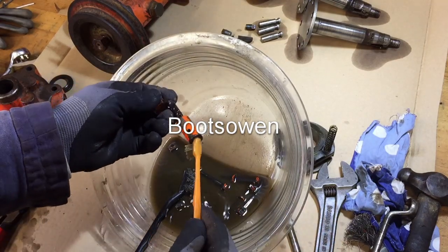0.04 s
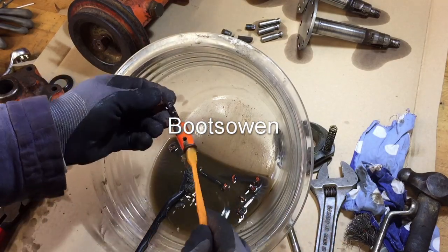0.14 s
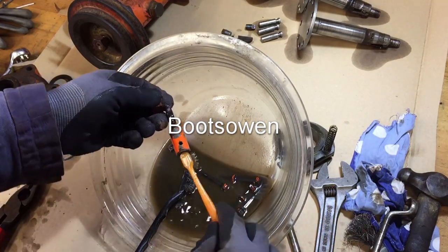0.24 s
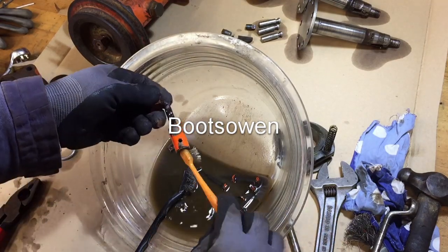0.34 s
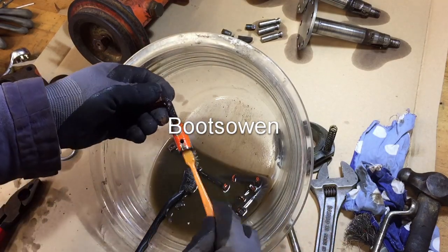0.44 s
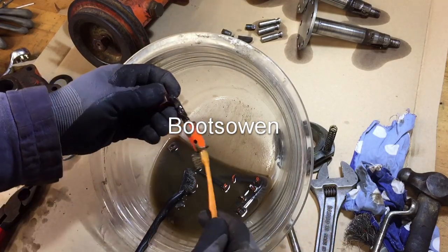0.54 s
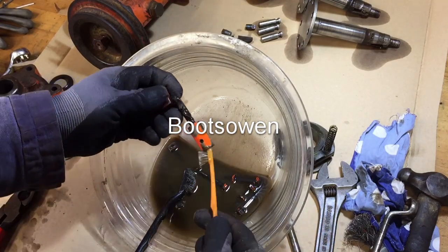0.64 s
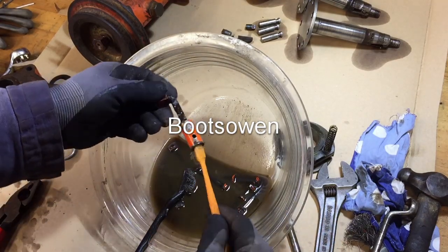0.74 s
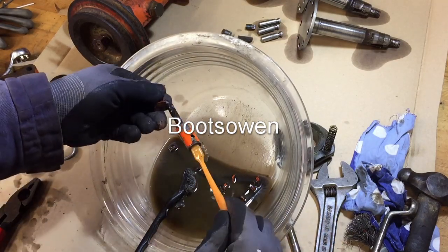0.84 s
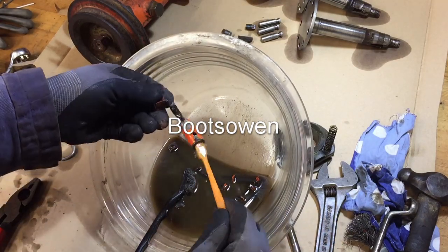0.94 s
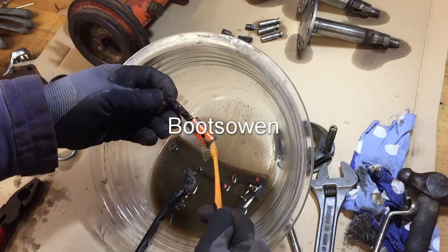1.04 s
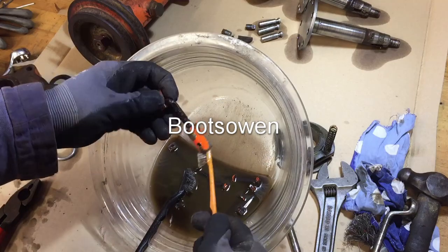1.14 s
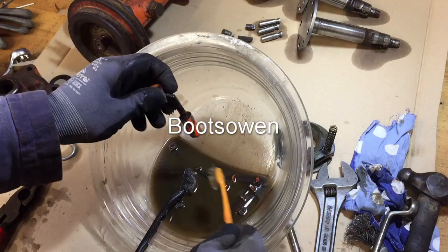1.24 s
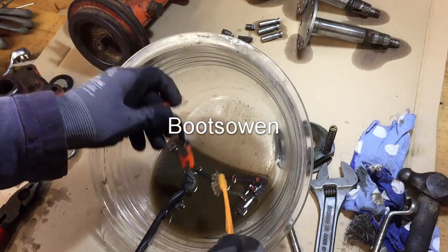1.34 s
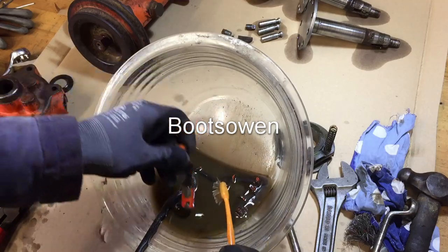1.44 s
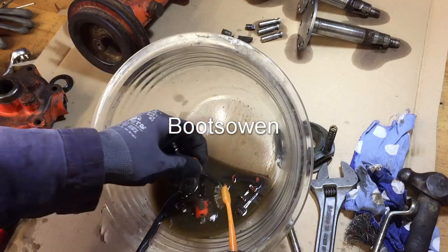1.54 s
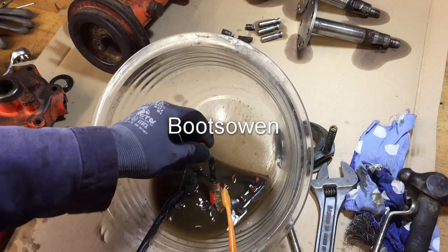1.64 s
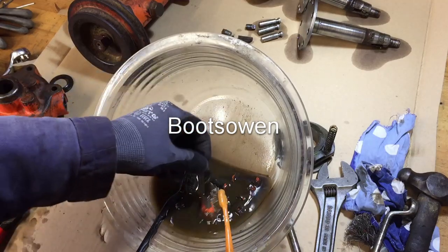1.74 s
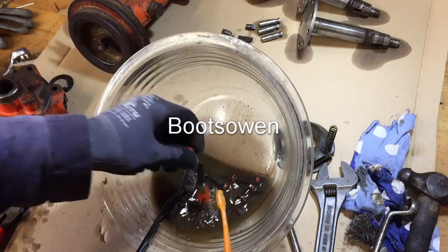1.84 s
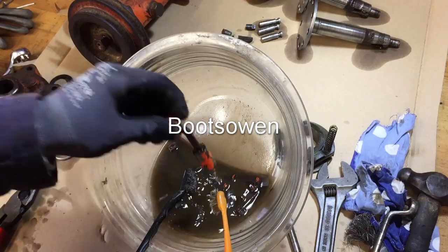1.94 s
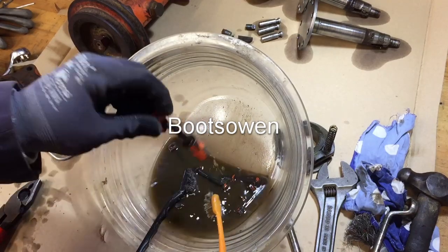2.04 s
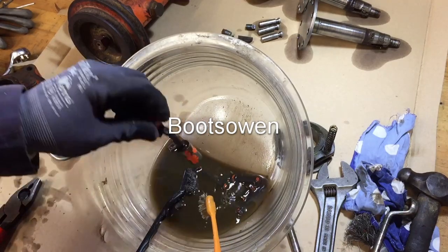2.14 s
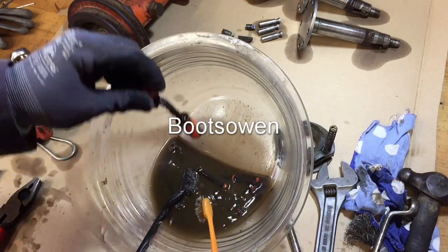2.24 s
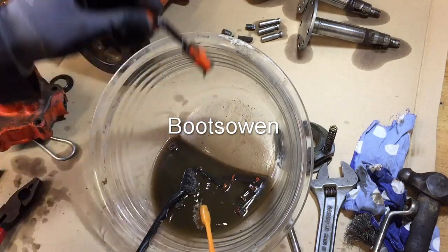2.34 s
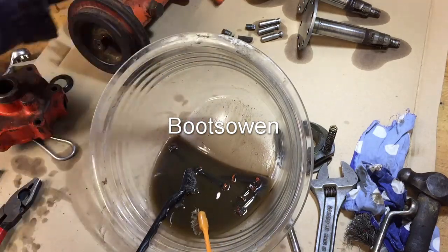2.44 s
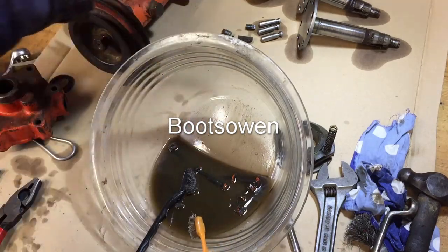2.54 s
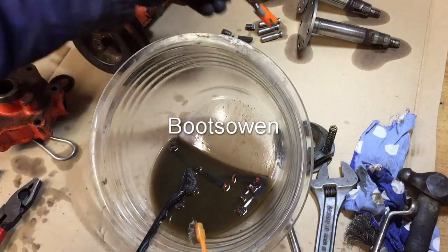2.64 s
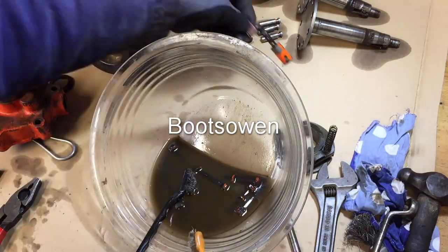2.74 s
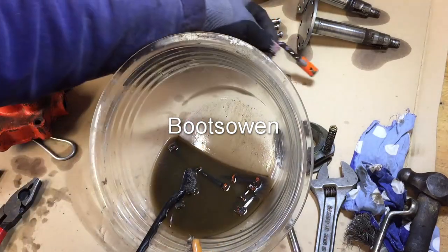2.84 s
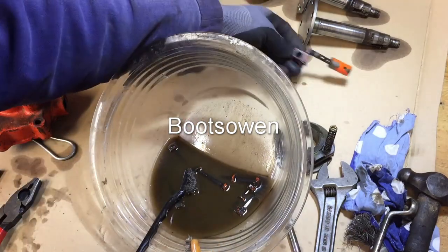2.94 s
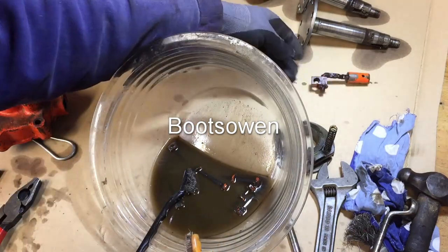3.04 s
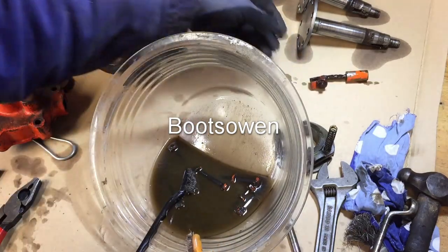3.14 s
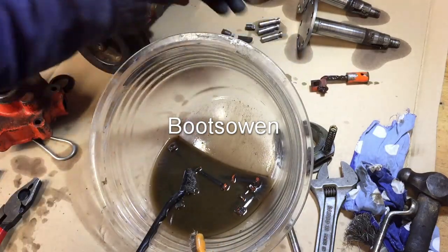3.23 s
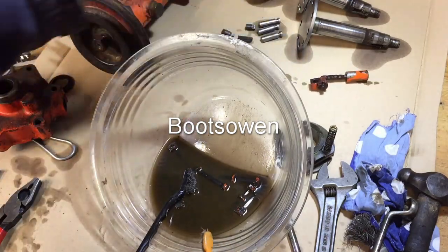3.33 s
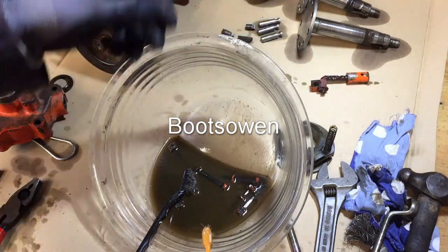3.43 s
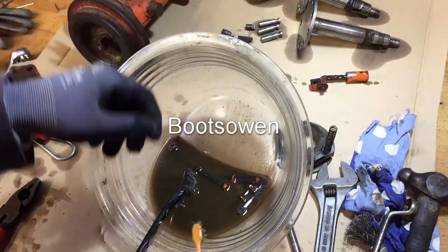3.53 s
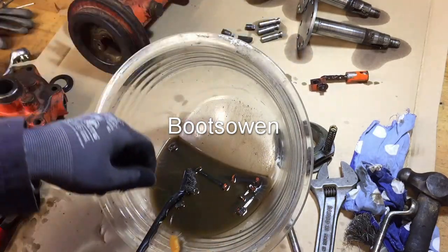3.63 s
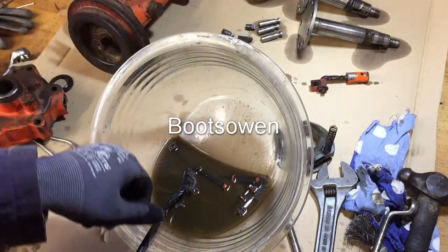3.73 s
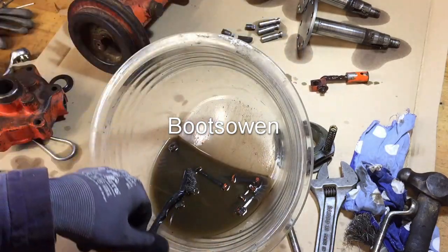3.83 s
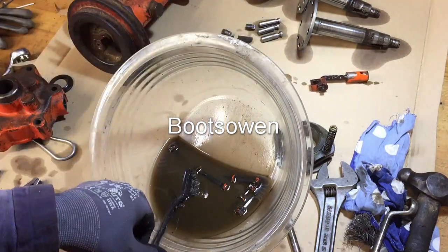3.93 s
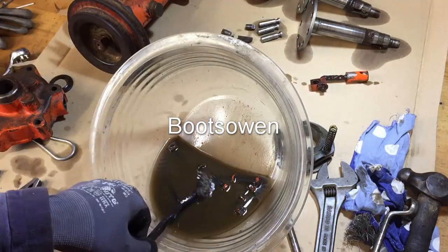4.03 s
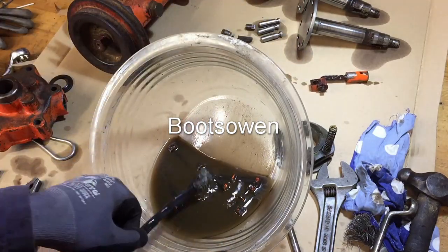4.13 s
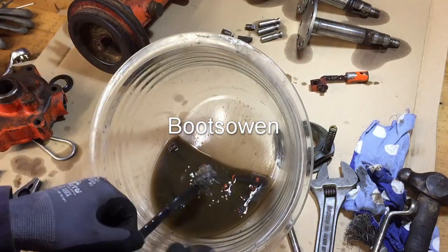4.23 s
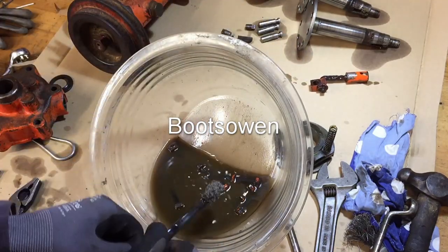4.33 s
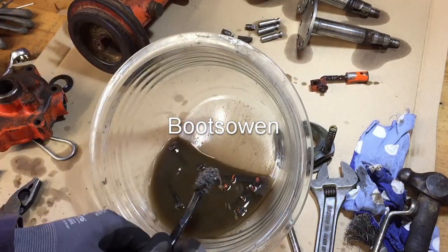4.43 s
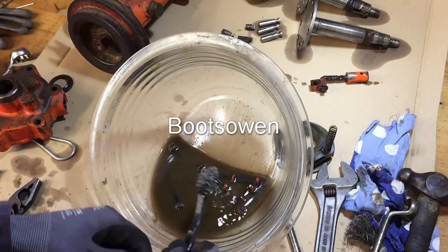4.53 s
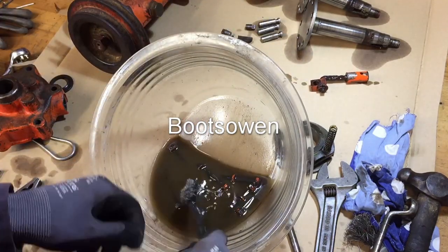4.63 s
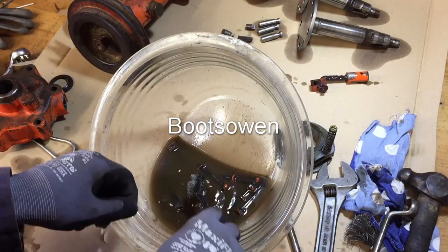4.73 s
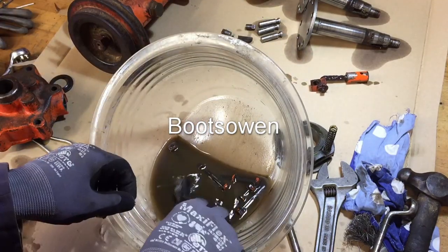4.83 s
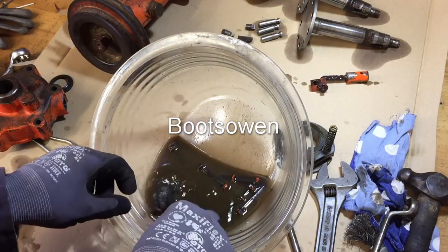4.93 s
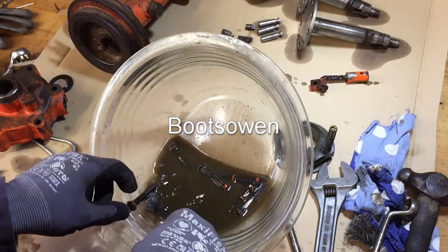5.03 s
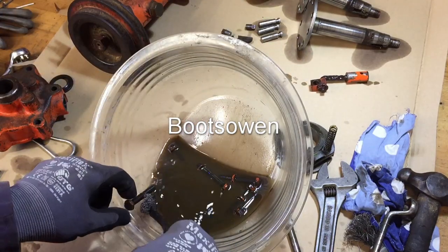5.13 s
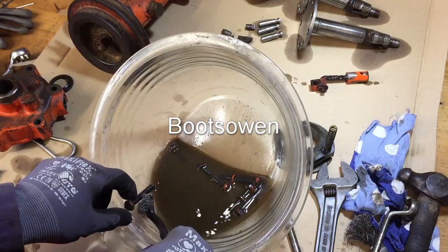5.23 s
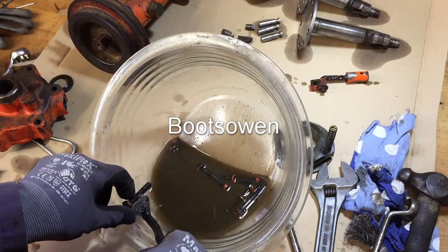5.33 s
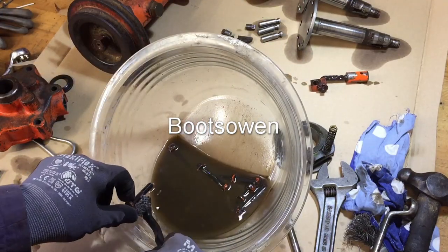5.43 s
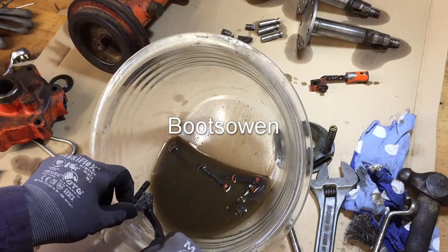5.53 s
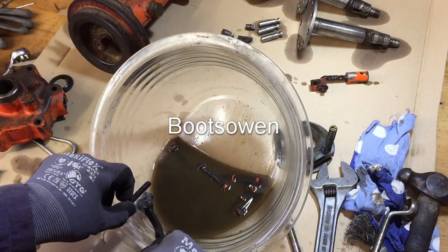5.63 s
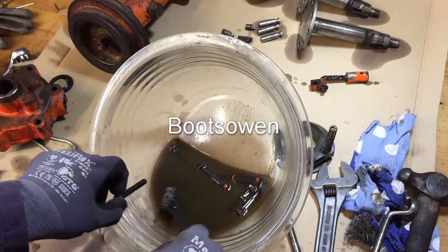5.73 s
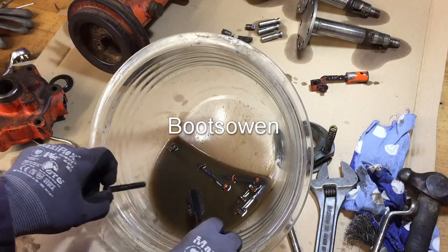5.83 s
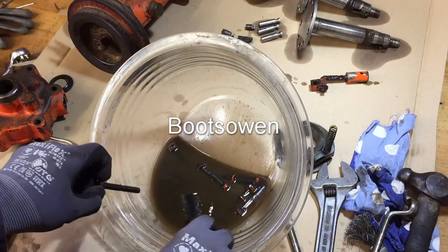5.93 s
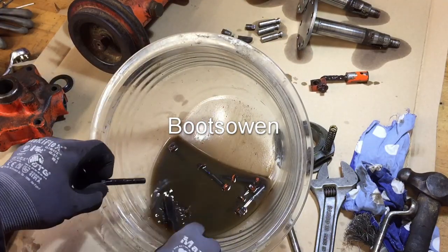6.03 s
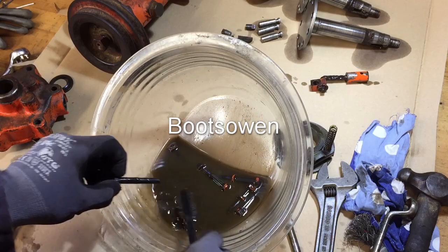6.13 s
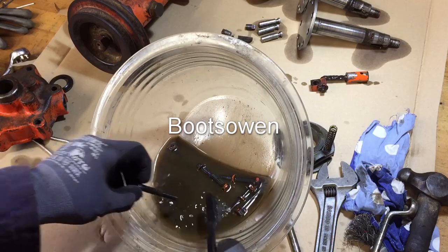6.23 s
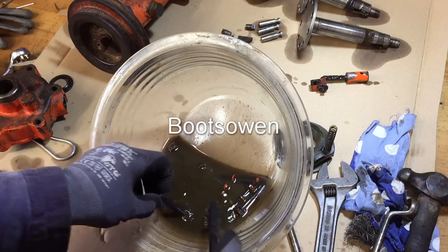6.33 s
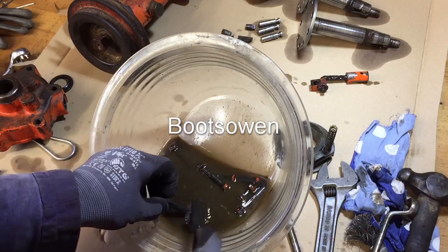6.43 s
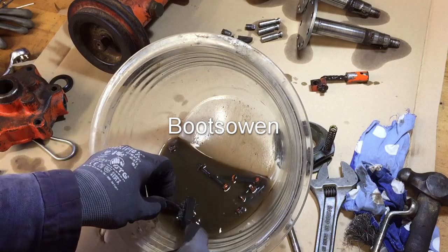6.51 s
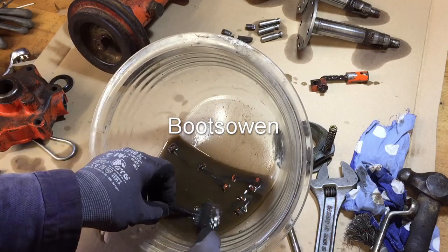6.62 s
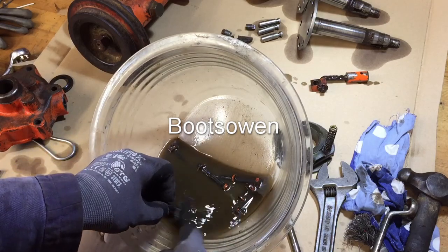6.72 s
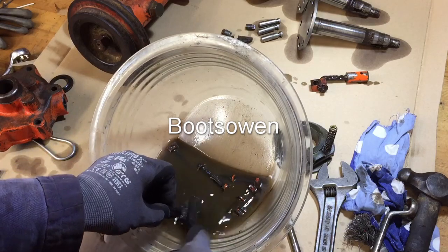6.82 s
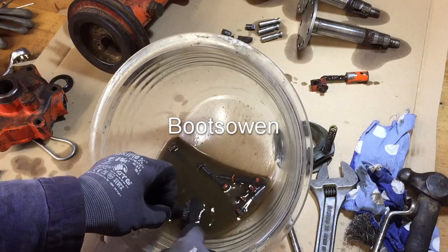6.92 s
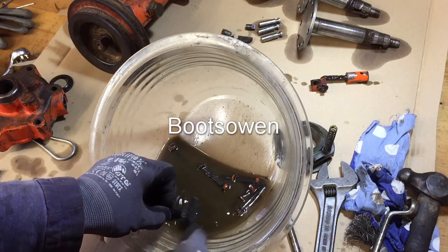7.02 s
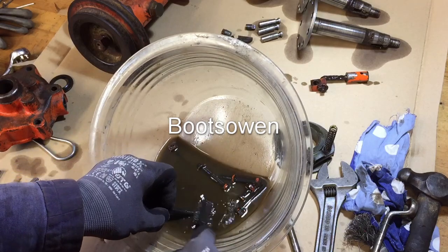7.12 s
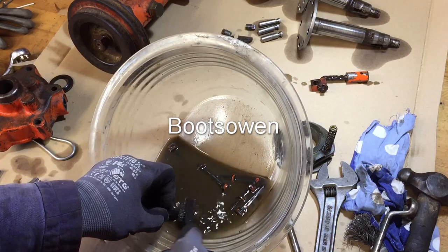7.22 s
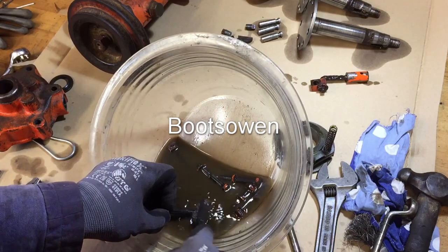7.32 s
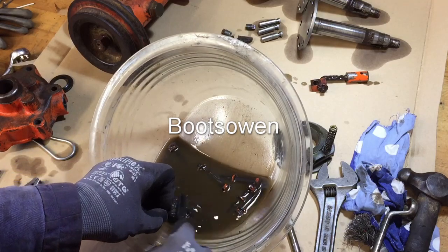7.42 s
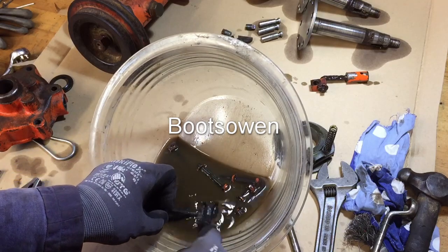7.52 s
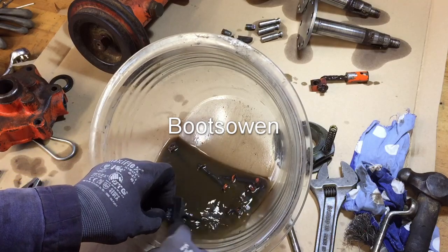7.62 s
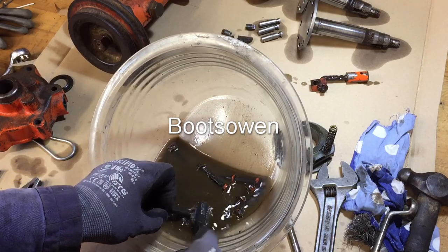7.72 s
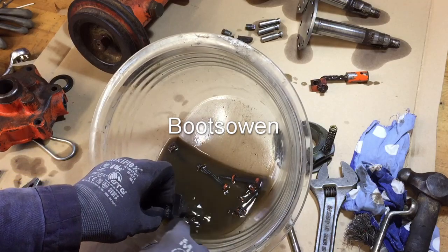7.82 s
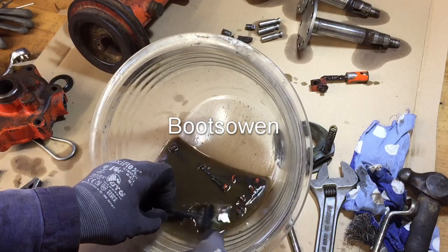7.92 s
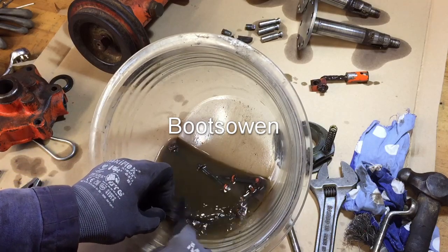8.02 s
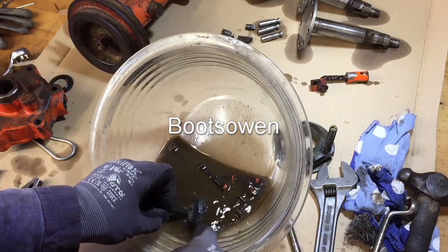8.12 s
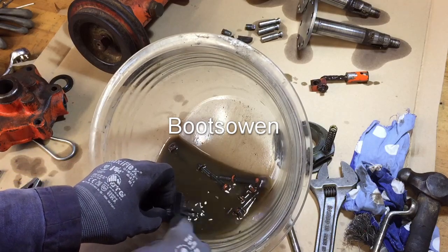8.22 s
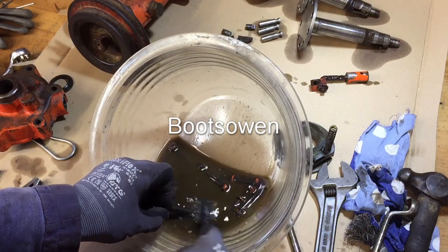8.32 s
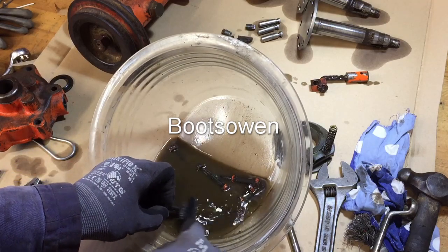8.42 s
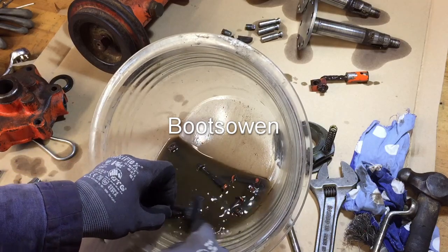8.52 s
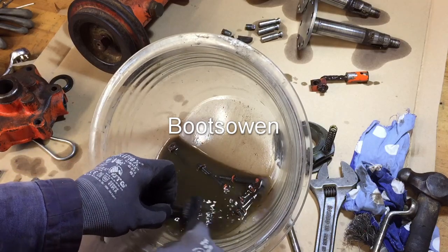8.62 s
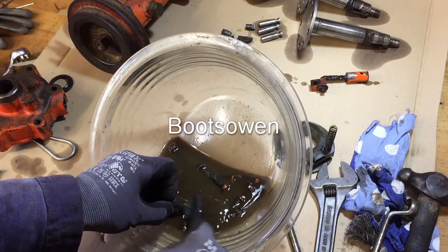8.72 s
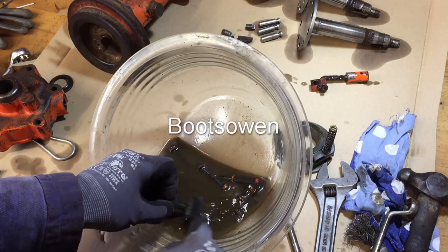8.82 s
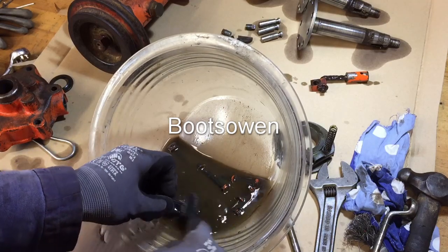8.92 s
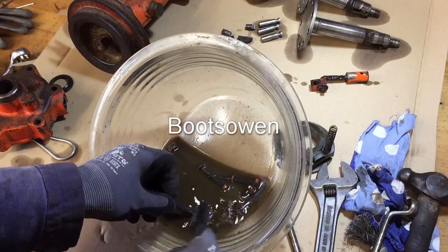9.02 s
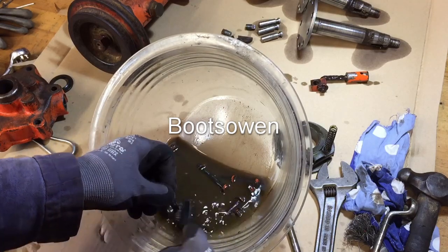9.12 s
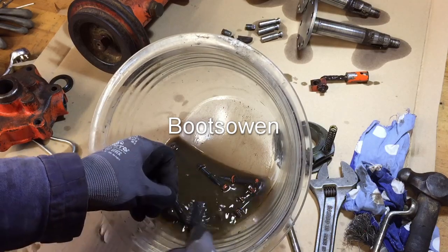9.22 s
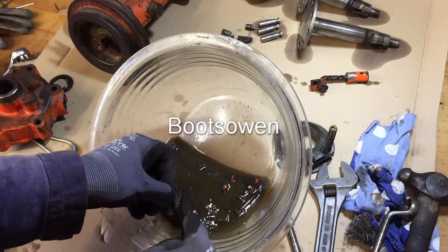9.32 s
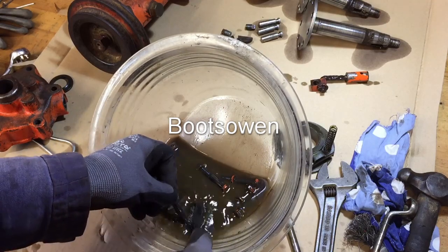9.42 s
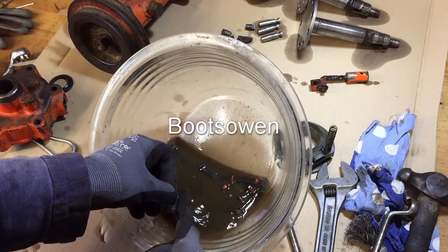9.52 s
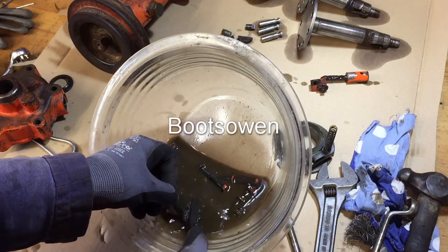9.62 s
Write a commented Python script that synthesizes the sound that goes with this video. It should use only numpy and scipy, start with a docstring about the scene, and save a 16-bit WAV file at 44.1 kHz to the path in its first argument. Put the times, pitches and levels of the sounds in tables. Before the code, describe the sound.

Very faint wet brush wipes open, broken by one hard bright clank on thick glass. After a quiet rustling gap, metal is set down on a bench with a click and dull bounces. A hollow woody knock, then quick glassy chatter and separate clinks lead into rapid, even scrubbing of stiff bristles on metal against the bowl. Close microphone, small dry room, faint low wavering air.

```python
"""A soft wet brush whispers first, close to the microphone, over a metal part cleaned in a glass bowl of solvent.
The part clinks on the glass and is put down on the bench; then a stiff brush scrubs a bolt held on the bowl.
Bristles are showers of tiny noise snaps with short twangs; the glass is a bank of decaying modes that sings
along with the scrubbing and rings when struck or scraped. Bench blows mix noise bursts with low modes.
Sleeve cloth, a small room's reflections and a faint wavering air lie behind."""
import sys
import numpy as np
from scipy import signal
from scipy.io import wavfile

SR = 44100
rng = np.random.default_rng(int(sys.argv[2]) if len(sys.argv) > 2 else 0)


def wav_record(signal):
    """Record a signal, one row per channel, as 16-bit PCM in the file named by sys.argv[1]."""
    frames = np.transpose(np.atleast_2d(signal))
    bounded = np.clip(frames, -1, 1)
    # unit amplitude maps onto the largest positive 16-bit level
    quanta = np.round(bounded * 32767).astype(np.int16)
    wavfile.write(sys.argv[1], SR, quanta)


N = 426006
TIME = np.arange(N) / SR  # the whole scene [s]
AGE = np.arange(SR * 3 // 4) / SR  # time since a blow [s]

# Runs of even to-and-fro scrubbing: (nominal middle of first stroke [s], time per stroke [s], strokes [count])
SCRUB_RUNS = [(6.829, .1143, 5), (7.399, .1045, 19), (9.383, .128, 3)]
# How hard the stiff brush bears on the bolt, before layer trims: (time [s], rub level [dB], hiss level [dB])
SCRUB_PRESSURE = [(6.83, -38, -42.5), (6.94, -29.5, -33.5), (7.12, -40, -36.5), (7.28, -31.5, -33),
                  (7.8, -34.5, -36), (8.14, -33.5, -29.5), (8.34, -39.5, -36), (8.55, -31.5, -31),
                  (8.75, -35, -34), (9.1, -33, -32.5), (9.5, -33.5, -41)]
# How firmly the bolt leans on the glass, before a quick random sway: (time [s], level [dB])
BOLT_LEAN = [(6.95, 3), (7.2, -3), (7.6, -1.5), (7.82, 2), (8.02, -3.5), (8.14, 7), (8.4, -8.5), (8.56, 10),
             (8.8, -1), (9.1, -2.5), (9.5, 3)]
# Tone of stiff bristles rubbing the bolt: (frequency [Hz], relative level [dB])
RUB_TONE = [(150, -42), (300, -17.5), (430, -2.5), (560, -21.5), (780, -31), (1200, -15), (1850, -12.5),
            (2350, 7), (2900, 5), (3300, -4), (3800, 3), (4600, -12.5), (7000, -11), (12000, -84)]
# Tone of the fine bright hiss: (frequency [Hz], relative level [dB])
HISS_TONE = [(1500, -37), (3000, -5.5), (5000, -4.5), (7000, -1.5), (8200, -0.5), (9400, 4.5), (11000, -3),
             (13000, 2.5), (16000, -10)]
# Soft bristles over wet metal, and the bright fizz of two clicks and a thump on the bench, before layer trims:
# (middle [s], half length [s], rub level [dB], touch [name])
LIGHT_TOUCHES = [(0.116, 0.036, -58, "wipe"), (0.215, 0.012, -56, "flick"), (0.442, 0.069, -66.5, "wipe"),
                 (0.75, 0.1, -68, "wipe"), (.972, 0.06, -66.5, "flick"), (1.232, 0.043, -65.5, "wipe"),
                 (1.426, .012, -65.5, "flick"), (1.528, 0.016, -61, "flick"), (1.722, .04, -51.5, "wipe"),
                 (4.151, .004, -55.5, "snap"), (4.265, 0.0033, -66.5, "snap"),
                 (4.445, 0.0091, -56.5, "wipe"), (4.52, 0.017, -69, "wipe"), (4.849, 0.0075, -55, "flick"),
                 (5.077, .012, -62.5, "flick"), (5.867, 0.0087, -59, "flick"),
                 (6.23, 0.038, -67.5, "flick")]
# Hiss of each touch against its wet rub, before layer trims: touch [name]: level [dB]
TOUCH_HISS_DB = {"wipe": -5, "flick": 4.5, "snap": 19}
# Centre pitch of the faint wet squeak: (time [s], frequency [Hz])
SQUEAK_PITCH = [(.12, 3300), (.23, 3720), (.44, 3040), (.7, 2220), (.97, 3300), (1.7, 2900)]
# Tone of the wet rub: (frequency [Hz], relative level [dB])
WET_TONE = [(300, -25), (550, -10), (900, -21.5), (1200, -15), (1700, -15.5), (2900, -7), (3500, 0.5),
            (4300, -13.5), (7000, -18.5), (12000, -42.5)]
# Where the bowl is struck, in the order of the mode levels below: place [name]
PLACES = ["floor", "wall", "rim", "side", "base"]
# Modes of the free-ringing bowl: (frequency [Hz], t60 [s], then one relative level [dB] for each place)
BOWL_MODES = [(520, 0.5, -22, -19, -29, -25, -29), (1355, 0.22, -6, -3, -14, -13, -17),
              (2305, 0.1, -5, -10, -17, -12, -5), (2370, 0.13, 0, -12, -14, -14, -11),
              (2462, 0.14, 0, 0, 0, -6, -8), (2776, 0.13, 0, -6, -17, -13, -11),
              (3572, 0.11, -5, -10, -34, 0, -6), (3630, 0.08, -7, -7, -25, -6, 0),
              (3803, 0.17, -11, -1, -8, -13, -7), (4000, 0.16, -16, -1, -20, -16, -15),
              (4260, 0.1, -7, -7, -19, -21, -3), (4630, 0.16, -26, -17, -14, -25, -24),
              (5253, 0.22, -16, -6, -19, -21, -19), (5495, 0.13, -12, -9, -14, -5, -13),
              (5548, 0.2, -10, -18, -30, -9, -11), (5986, 0.19, -21, -18, -12, -25, -26),
              (6150, 0.18, -19, -10, -19, -23, -22), (6268, 0.15, -12, -7, -23, -23, -20),
              (6460, 0.2, -20, -15, -15, -22, -22), (6720, 0.13, -17, -6, -29, -17, -7),
              (6982, 0.18, -26, -6, -14, -20, -26), (7284, 0.11, -29, -9, -23, -6, -22),
              (7405, 0.11, -17, -19, -31, -13, -14), (7765, 0.15, -18, -12, -19, -20, -21),
              (8172, 0.12, -21, -18, -31, -18, -15), (8745, 0.14, -19, -6, -18, -12, -17),
              (9240, 0.13, -27, -15, -24, -30, -23), (10930, 0.1, -18, -25, -28, -38, -29),
              (11340, 0.15, -27, -21, -31, -33, -28)]
# Blows on the glass: (time [s], level [dB], place [name])
CLINKS = [(0.209, -41.5, "side"), (1.7383, 4, "floor"), (1.973, -42.5, "wall"), (5.108, -17.5, "wall"),
          (5.123, -12.5, "wall"), (5.166, -15, "wall"), (5.207, -16.5, "wall"), (5.216, -16.5, "wall"),
          (5.250, -15, "wall"), (5.426, -37, "floor"), (5.546, -36.5, "floor"), (5.598, -43, "wall"),
          (5.7004, -20, "rim"), (6.031, -38, "floor"), (6.1116, -9, "rim"), (6.580, -3.5, "side"),
          (6.786, -43.5, "floor"), (7.766, -12, "base"), (8.187, -9.5, "base"), (8.4889, -15, "base"),
          (9.2356, -7, "base")]
# How metal meets each place: place [name]: (ring time [factor], clatter before its trim [dB],
# clatter slope above 2500 Hz [dB/octave], mode slope above 2500 Hz [dB/octave])
CONTACT = {"floor": (0.7756, -4, -5.5, -2.5), "wall": (1.12, -7, 6, -1), "rim": (1, -4.5, 0.5, 0.5),
           "side": (0.93, -9.5, 2.5, 0.5), "base": (0.77, -10, 4.5, -1)}
# Tone of the crowded small glass modes: (frequency [Hz], relative level [dB])
CLATTER_TONE = [(150, -27.5), (500, -21), (1000, -12), (1900, -6.5), (2400, -2.5), (3100, -6), (3650, 1.5),
                (4700, -8.5), (5500, -4), (8700, -15.5), (10000, -20), (16000, -28.5)]
# Metal dragged over glass: (middle [s], half length [s], dull grating level [dB], bright chatter level [dB])
SCRAPES = [(5.147, 0.03, -44, -37.5), (5.225, 0.046, -46, -37), (5.57, 0.026, -53.5, -66),
           (6.048, 0.035, -53, -76), (9.27, 0.02, -40.5, -54)]
# Tone of the dull grating: (frequency [Hz], relative level [dB])
GRATING_TONE = [(300, -49), (900, -3), (1400, 8.5), (1800, 8), (2500, 2), (3100, -13), (7000, -57),
                (16000, -42)]
# Blows on the bench and on the liquid: (time [s], level [dB], kind [name])
KNOCKS = [(2.11, -33.5, "thump"), (3.2257, -15, "click"), (4.148, -31.5, "click"), (4.1716, -8, "handle"),
          (4.264, -47, "click"), (4.276, -40.5, "plop"), (4.3407, -35.5, "plop"), (4.52, -50, "plop"),
          (4.677, -50.5, "click"), (4.846, -33, "thump")]
# Recipe of each blow: kind [name]: (sharp click [dB], hollow knock [dB], dull thud [dB], boom before its trim [dB])
KNOCK_MIX = {"click": (-1, -16, -19.5, -19), "handle": (-9, 0, -16, -43.5), "thump": (-5.5, -25, 0, -9.5),
             "plop": (-26, -17, 1.5, -21), "bounce": (0, -22, -5, -3.5)}
# Tone of the hard click: (frequency [Hz], relative level [dB])
CLICK_TONE = [(470, -42.5), (900, -8), (2300, -8), (3300, -4.5), (4300, 0.5), (6000, -10), (10000, -17.5),
              (16000, -23.5)]
# Tone of the hollow knock: (frequency [Hz], relative level [dB])
HOLLOW_TONE = [(100, -11), (250, -10), (700, 5), (1050, -3), (1430, 3), (1950, -11), (2550, 3), (3700, -4),
               (4150, -1), (4700, -24), (6000, -18.5), (9000, -24.5), (16000, -45.5)]
# Tone of the dull thud: (frequency [Hz], relative level [dB])
THUD_TONE = [(50, -10.5), (130, -17), (220, -2.5), (450, -8.5), (1200, -16), (2500, -27.5), (8000, -44)]
# Booming modes of the bench top: (frequency [Hz], t60 [s], relative level [dB])
BENCH_MODES = [(67.3, .25, -8.5), (109, 0.17, -3), (129, 0.084, -6.5), (170, 0.14, -2), (214.4, 0.12, -1),
               (263.5, .12, -13), (420, 0.1, -9)]
# The bowl rocks on the bench under the hands: (time [s], level before the rumble trim [dB])
ROCKING = [(1.07, -49), (1.743, -36), (7.313, -33.5), (7.747, -41.5), (8.572, -32), (8.614, -32.5),
           (9.003, -38), (9.199, -44.5)]
# Rumbling modes of the rocking bowl: (frequency [Hz], t60 [s], relative level [dB])
ROCK_MODES = [(62.3, 0.49, -0.5), (97, 0.25, -3), (139, 0.088, -7), (172, 0.11, -9)]
# The arm reaches across the bench: (fastest moment [s], cloth level [dB], swell time [s], fade time [s])
REACHES = [(2.57, -60, 0.47, 0.83), (4.45, -66, .25, 0.23), (4.83, -56, 0.045, 0.033),
           (6.11, -64.5, 0.31, .09)]
# Tone of sliding cloth: (frequency [Hz], relative level [dB])
CLOTH_TONE = [(88, -35), (150, -6), (259, -1), (854, -13.5), (1240, -6), (1450, -10), (2760, -11),
              (3100, -13), (16000, -44.5)]
# Reverberation of the small room: (frequency [Hz], t60 [s])
ROOM_DECAY = [(100, 0.95), (500, 0.2), (2500, 0.32), (7000, .24), (15000, 0.28)]
# Tone of the quiet air before its bass wavers: (frequency [Hz], relative level [dB])
AIR_TONE = [(15, -33.5), (25, -4), (76, 4.5), (161, -11), (734, -22), (1890, -22), (3720, -24),
            (4870, -29.5), (5430, -26.5), (9070, -28.5), (10400, -33), (12900, -28), (16000, -37.5)]

# Pushes alternate with pulls: a push is shorter and late, a pull early by the same time
PUSH_HALF_S, PULL_HALF_S, PUSH_LATE_S = 0.035, 0.038, 0.0046
# In the end the pushes only graze the bolt
GRAZE_FROM_S, GRAZE_RUB_DB, GRAZE_HISS_DB = 9.12, -16.5, -5.5
# The part that was put down tips over and bounces to rest, each bounce sooner and weaker
SETTLE_S, SETTLE_DB, BOUNCE_LOSS_DB = 3.2493, -23, 8.5
BOUNCE_GAP_S, BOUNCE_GAP_SHARE = 0.071, 0.83  # first gap, and each gap as a share of the one before
AIR_DB = -63.5
LOW_CUT_HZ, EDGE_HZ = 42, 16200


def scrubbing(rub_db=-4.5, sing_db=-10, drone_db=-18, catch_db=2.5, lean_db=1.5, soft_db=-7,
              squelch_db=-5, squelch_hz=2800, squelch_width_hz=200, squelch_drift=0.13):
    """Stiff bristles flick off the bolt; the bolt passes the rubbing on to the glass."""
    rub, hiss = swells(strokes(), rub_reach=0.77, hiss_reach=0.6, rub_lead=0.00031, drag_db=-30)
    catch = amp(catch_db * wander(rate=170))  # tufts catch and let go together
    push = rub * evened(catch * flicks(per_s=5900, spread_db=0))
    spray = hiss * evened(catch * flicks(per_s=9200, spread_db=4.5))
    slow = amp(-5) * twangs(rub, RUB_TONE, 2200, 4500, per_s=30, t60=0.05, count=26)
    quick = amp(-4) * twangs(hiss, HISS_TONE, 5000, 15500, per_s=60, t60=0.016, count=22)
    # the wet tuft rings at a shifting pitch
    film_hz = squelch_hz * np.exp(squelch_drift * wander(rate=25))
    film = resonate(catch * rng.standard_normal(N), film_hz, squelch_width_hz)
    squelch = amp(squelch_db) * rub * evened(film)
    bristles = amp(rub_db) * colour(push, RUB_TONE) + colour(spray, HISS_TONE) + slow + quick + squelch
    # the bolt leans now harder, now lighter on the glass
    contact = amp(np.interp(TIME, *np.transpose(BOLT_LEAN)) + lean_db * np.tanh(wander(rate=17)))
    singing = signal.oaconvolve(push * contact, rubbed_glass(sing_db, drone_db, soft_db))[:N]
    return bristles + singing


def rubbed_glass(sing_db, drone_db, soft_db):
    """Response of the bowl to rubbing, which favours the low modes and flexes the whole bowl."""
    modes = np.array(BOWL_MODES)
    octaves_up = np.maximum(np.log2(modes[:, 0] / 2000), 0)
    glass = ring(modes[:, 0], modes[:, 1], modes[:, 2:].max(1) + soft_db * octaves_up)
    lowest = ring(modes[:1, 0], modes[:1, 1] / 2, modes[:1, 2])  # damped by the pressing hand
    return amp(sing_db) * glass / np.linalg.norm(glass) + amp(drone_db) * lowest / np.linalg.norm(lowest)


def strokes():
    """Pushes and pulls of the stiff brush: (middle [s], half length [s], rub level [dB], hiss level [dB])."""
    beats = np.concatenate([first + pace * np.arange(count) for first, pace, count in SCRUB_RUNS])
    push = np.arange(len(beats)) % 2 == 0
    middle = beats + np.where(push, PUSH_LATE_S, -PUSH_LATE_S)
    grazing = push & (middle > GRAZE_FROM_S)
    s, rub_db, hiss_db = np.transpose(SCRUB_PRESSURE)
    return np.transpose([middle, np.where(push, PUSH_HALF_S, PULL_HALF_S),
                         np.interp(middle, s, rub_db) + GRAZE_RUB_DB * grazing,
                         np.interp(middle, s, hiss_db) + GRAZE_HISS_DB * grazing])


def swells(rows, rub_reach, hiss_reach, rub_lead, drag_db):
    """Gains of a dull and a bright layer: each row peaks mid-way over a wider, weaker drag."""
    rub, hiss = np.zeros((2, N))
    t = np.arange(-SR // 10, SR // 10) / SR
    for s, half, rub_db, hiss_db in rows:
        start = max(s + t[0], 0)
        drag = amp(drag_db) * np.exp(-(t / half / 2) ** 2)
        add(rub, start, amp(rub_db) * (np.exp(-((t + rub_lead) / half / rub_reach) ** 2) + drag))
        add(hiss, start, amp(hiss_db) * (np.exp(-(t / half / hiss_reach) ** 2) + drag))
    return rub, hiss


def twangs(pressure, spectrum, low_hz, high_hz, per_s, t60, count):
    """Bent bristles spring free and ring briefly, each at its own pitch."""
    out, t = np.zeros(N), AGE[:SR // 10]
    envelope = dying(t60, t) * (1 - dying(t60 / 10, t))
    for hz in np.geomspace(low_hz, high_hz, count):
        tone = amp(read(spectrum, hz)) * np.sin(2 * np.pi * hz * t) * envelope
        moments = rng.integers(0, N, round(per_s * N / SR))
        sizes = pressure[moments] * rng.standard_normal(len(moments))
        for at, size in zip(moments, sizes):
            if size:
                add(out, at / SR, size * tone)
    return evened(out) * np.sqrt(np.mean(pressure ** 2))


def light_touches(wet_db=-2, hiss_db=1, squeak_db=-2.5, squeak_width_hz=140):
    """Soft wet bristles fizz and squeak faintly, and a few bench blows add a bright fizz."""
    rows = [(s, half, db, db + TOUCH_HISS_DB[touch]) for s, half, db, touch in LIGHT_TOUCHES]
    rub, hiss = swells(rows, rub_reach=1, hiss_reach=1, rub_lead=0, drag_db=-22)
    slips = flicks(per_s=4600, spread_db=4.0)
    pitch = np.interp(TIME, *np.transpose(SQUEAK_PITCH)) * (1 + 0.022 * wander(rate=23))
    squeak = rub * evened(resonate(slips, pitch, squeak_width_hz))
    fizz = colour(hiss * flicks(per_s=5560, spread_db=4.5), HISS_TONE)
    return amp(wet_db) * colour(rub * slips, WET_TONE) + amp(squeak_db) * squeak + amp(hiss_db) * fizz


def clinks(small_modes_db=-7.0, clatter_t60=0.085, crack_t60=0.008, vary_db=2,
           early_db=-4, early_t60=0.036, rise=0.00022):
    """Metal hits glass: the place picks the modes, and a part that stays pressed on damps them."""
    modes, out = np.array(BOWL_MODES), np.zeros(N)
    octaves_up = np.maximum(np.log2(modes[:, 0] / 2500), 0)
    for s, db, place in CLINKS:
        ring_time, clatter_db, clatter_slope_db, mode_slope_db = CONTACT[place]
        weights_db = modes[:, 2 + PLACES.index(place)] + mode_slope_db * octaves_up
        weights_db = weights_db + vary_db * rng.standard_normal(len(modes))
        # an extra early decay makes the start die fastest
        contact = (1 + amp(early_db) * dying(early_t60)) / (1 + amp(early_db))
        tone = contact * ring(modes[:, 0], modes[:, 1] * ring_time, weights_db)
        burst = dying(clatter_t60 * np.sqrt(ring_time)) + dying(crack_t60)
        spectrum = [(hz, gain_db + clatter_slope_db * max(np.log2(hz / 2500), 0))
                    for hz, gain_db in CLATTER_TONE]
        clatter = colour(rng.standard_normal(len(AGE)) * burst, spectrum)
        blow = tone + amp(clatter_db + small_modes_db) * clatter
        add(out, s, amp(db) * blow * (1 - np.exp(-AGE / rise)))
    return out


def scrapes(sing_db=-2):
    """Metal stutters over the glass and keeps the bowl ringing."""
    dull, bright = swells(SCRAPES, rub_reach=1, hiss_reach=1, rub_lead=0, drag_db=-40)
    slips = flicks(per_s=1200, spread_db=3.5)
    modes = np.array(BOWL_MODES)
    wall = ring(modes[:, 0], modes[:, 1], modes[:, 2 + PLACES.index("wall")])
    sing = signal.oaconvolve(dull * slips, wall / np.linalg.norm(wall))[:N]
    return colour(dull * slips, GRATING_TONE) + colour(bright * slips, CLATTER_TONE) + amp(sing_db) * sing


def knocks(click_t60=0.016, knock_t60=0.019, thud_t60=0.078, boom_rise=0.0034, bench_top_db=10):
    """A hard contact, a short hollow knock, a dull thud and the slower boom of the bench top."""
    out = np.zeros(N)
    for s, db, kind in KNOCKS + bounces():
        click_db, knock_db, thud_db, boom_db = db + np.array(KNOCK_MIX[kind])
        a, b, c = rng.standard_normal((3, len(AGE)))
        thud = c * dying(thud_t60) * (1 - dying(thud_t60 / 10))
        boom = ring(*np.transpose(BENCH_MODES)) * (1 - np.exp(-AGE / boom_rise))
        add(out, s, amp(click_db) * colour(a * dying(click_t60), CLICK_TONE))
        add(out, s, amp(knock_db) * colour(b * dying(knock_t60), HOLLOW_TONE))
        add(out, s, amp(thud_db) * colour(thud, THUD_TONE))
        add(out, s, amp(boom_db + bench_top_db) * boom)
    return out


def bounces(count=4):
    """The blows of a part bouncing to rest: (time [s], level [dB], kind [name])."""
    s, rows = SETTLE_S, []
    for k in range(count):
        rows.append((s, SETTLE_DB - k * BOUNCE_LOSS_DB, "bounce"))
        s += BOUNCE_GAP_S * BOUNCE_GAP_SHARE ** k
    return rows


def rocking(rise=0.011, rumble_db=5):
    """Soft pushes set the heavy bowl rumbling on the bench."""
    out = np.zeros(N)
    for s, db in ROCKING:
        rumble = ring(*np.transpose(ROCK_MODES)) * (1 - np.exp(-AGE / rise))
        add(out, s, amp(db + rumble_db) * rumble)
    return out


def sleeve(crease_db=2.0):
    """Cloth slides as the arm reaches across the bench: each reach swells and fades."""
    speed = np.zeros(N)
    for s, db, swell, fade in REACHES:
        speed += amp(db) * np.exp(-np.maximum((s - TIME) / swell, (TIME - s) / fade))
    creases = amp(crease_db * wander(rate=25))
    return creases * speed * colour(flicks(per_s=27000, spread_db=0.5), CLOTH_TONE)


def workshop(x):
    """A small room: dense reflections whose decay time depends on frequency."""
    taps = rng.standard_normal(len(AGE)) * (rng.random(len(AGE)) < 0.1) * (AGE > 0.004)
    hz, t, z = signal.stft(taps, SR, nperseg=256)
    tail = signal.istft(z * dying(read(ROOM_DECAY, hz)[:, None], t), SR, nperseg=256)[1]
    return signal.oaconvolve(x, tail / np.linalg.norm(tail))[:N]


def still_air(waver_db=6.0):
    """The quiet room: a faint hiss over a low rumble that wavers."""
    air = amp(AIR_DB) * noise(AIR_TONE)
    low = signal.sosfiltfilt(signal.butter(2, 130, fs=SR, output="sos"), air)
    air = air + low * (amp(waver_db * wander(rate=27)) - 1)
    return signal.sosfilt(signal.butter(3, 42, "high", fs=SR, output="sos"), air)


def ring(hz, t60, db):
    """Decaying sine modes in random phase, with gains of unit summed power."""
    gain = amp(db) / np.linalg.norm(amp(db))
    phase = rng.uniform(0, 2 * np.pi, (len(hz), 1))
    return gain @ (np.sin(2 * np.pi * hz[:, None] * AGE + phase) * dying(t60[:, None]))


def resonate(x, hz, width):
    """A resonance of gain 1 that follows the curve hz: shift down to 0 Hz, smooth, shift back."""
    turn = np.exp(2j * np.pi * np.cumsum(hz) / SR)
    r = np.exp(-np.pi * width / SR)
    return 2 * (turn * signal.lfilter([1 - r], [1, -r], x / turn + 1e-18)).real


def flicks(per_s, spread_db):
    """Tiny snaps of uneven size at random moments, rms 1."""
    size = amp(spread_db * np.minimum(rng.exponential(1, N), 4))
    return evened(size * rng.standard_normal(N) * (rng.random(N) < per_s / SR))


def wander(rate):
    """Smooth chance of rms 1, changing rate times a second."""
    return evened(np.interp(TIME * rate, np.arange(N // 20), rng.standard_normal(N // 20)))


def noise(spectrum):
    """Steady coloured noise of rms 1."""
    return evened(colour(rng.standard_normal(N), spectrum))


def colour(x, spectrum):
    """Causal minimum-phase filter of unit energy with the given spectrum."""
    log_gain = np.log(amp(read(spectrum, abs(np.fft.fftfreq(4096, 1 / SR)))))
    taps = np.fft.ifft(np.exp(np.conj(signal.hilbert(log_gain)))).real[:2048]
    return signal.oaconvolve(x, taps / np.linalg.norm(taps))[:len(x)]


def dying(t60, t=AGE):
    """Exponential decay by 60 dB in t60 seconds."""
    return np.exp(-np.log(1000) * t / t60)


def read(points, hz):
    """Reads a table on a log-frequency axis."""
    f, value = np.transpose(points)
    return np.interp(np.log(hz + 1), np.log(f + 1), value)


def add(mix, s, sound):
    """Mixes a sound in at time s."""
    part = mix[round(s * SR):][:len(sound)]
    part += sound[:len(part)]


def evened(x):
    """Scales to rms 1."""
    return x / np.sqrt(np.mean(x ** 2) + 1e-20)


def amp(db):
    """Turns decibels into a gain."""
    return 10 ** (np.asarray(db) / 20)


def scene():
    """Everything on the bench, its reflections and the still air of the room."""
    brushes = scrubbing() + light_touches()
    glass = clinks() + scrapes()
    bench = knocks()
    room = workshop(amp(-16.5) * brushes + amp(-15.0) * glass + amp(-11.5) * bench)
    return (brushes + glass + bench + room + rocking() + sleeve() + still_air())[None]


def record(dry):
    """The microphone drops the deepest bass, the hardest blows overload the input; then the band limit."""
    picked_up = signal.sosfilt(signal.butter(2, LOW_CUT_HZ, "high", fs=SR, output="sos"), dry)
    clipped = np.clip(picked_up, -0.69, 0.69)
    band_limit = signal.firwin(511, EDGE_HZ, window=("kaiser", 9), fs=SR)
    return signal.oaconvolve(clipped, band_limit[None], "same")


dry = scene()
out = record(dry)
wav_record(out)
```